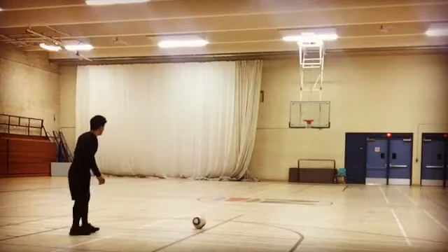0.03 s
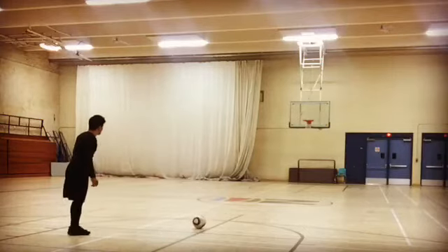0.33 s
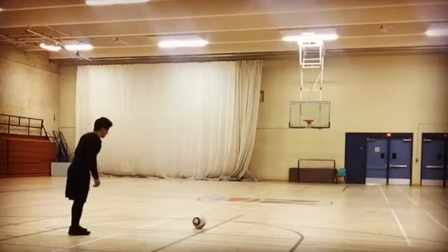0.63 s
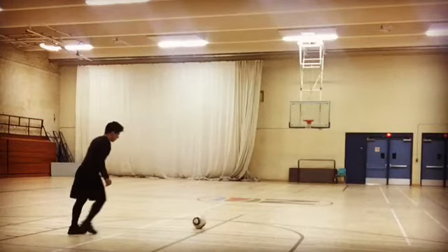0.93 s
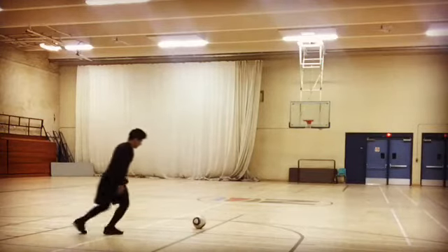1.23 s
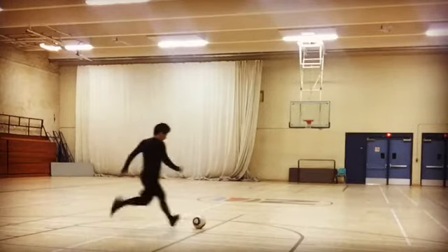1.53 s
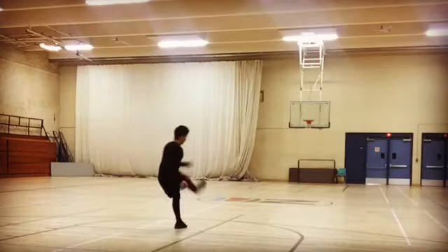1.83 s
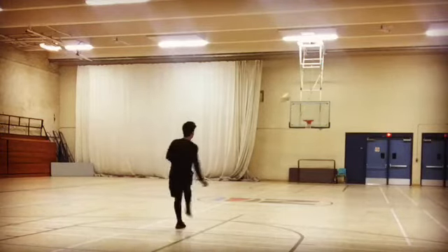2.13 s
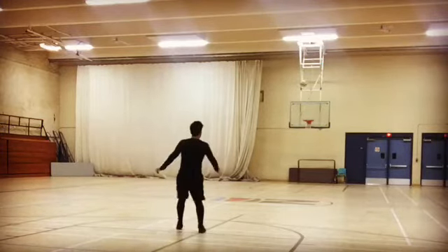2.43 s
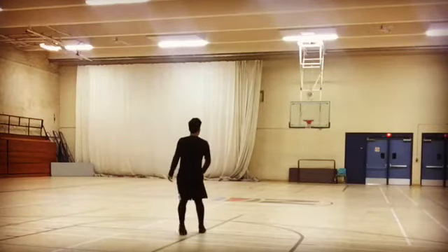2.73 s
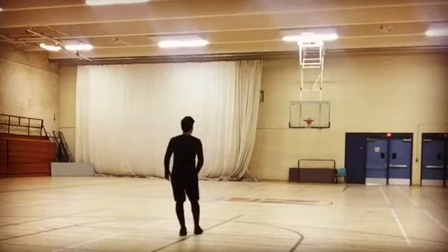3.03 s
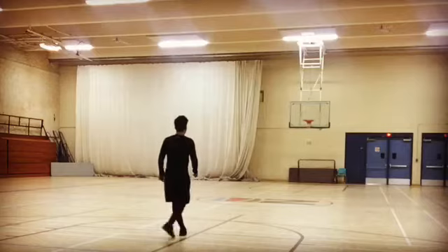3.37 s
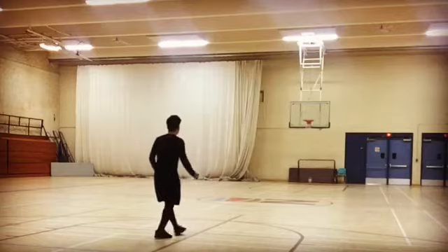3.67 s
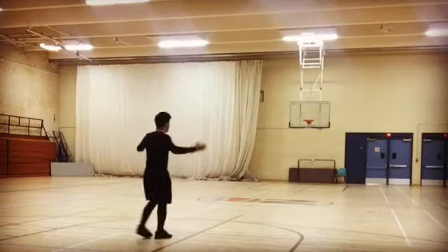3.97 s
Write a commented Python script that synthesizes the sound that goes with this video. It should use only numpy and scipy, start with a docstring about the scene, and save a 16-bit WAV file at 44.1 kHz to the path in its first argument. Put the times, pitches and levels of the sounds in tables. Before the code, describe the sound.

A ball is kicked with a loud, hollow smack after a few scuffing steps in a large, echoing gym. Shoes thud and squeak, then the ball bangs a distant hoop and bounces on the wooden floor. Ventilation rumbles throughout.

```python
"""Ventilation rumbles in a large, echoing gym, and rubber soles scuff the wooden floor in a run-up.
The kick lands with a smack, a hollow ring and a deep thump, and the far walls throw it back.
Clothes rustle; the player thuds onto the sprung floor and shuffles, soles squeaking as they twist.
The ball bangs against the far hoop, whose steel frame rattles and rings, then drops with a slap
onto the booming boards. A tiny dry click follows, and the rumble runs throughout."""
import sys
import numpy as np
from scipy import signal
from scipy.fft import rfft, irfft, next_fast_len
from scipy.io import wavfile
from scipy.ndimage import uniform_filter1d, map_coordinates

SR = 44100
rng = np.random.default_rng(int(sys.argv[2]) if len(sys.argv) > 2 else 0)


def materialize(psi):
    """Save the field psi as 16-bit PCM at rate SR to the path in sys.argv[1].

    A 1-D psi becomes a single channel; in a 2-D psi each row is a channel.
    """
    bounded = np.clip(np.atleast_2d(psi).T, -1, 1)
    quanta = np.round(bounded * 32767).astype(np.int16)
    wavfile.write(sys.argv[1], SR, quanta)


N = 176400
T = np.arange(2 * SR) / SR  # the two-second time axis of one event [s]


def amp(db):
    """Decibels to gain."""
    return 10 ** (np.asarray(db) / 20)


def along(points, hz):
    """Read a curve of (frequency, value) points on a log frequency axis."""
    freqs, values = np.transpose(points)
    return np.interp(np.log(hz + 1), np.log(freqs + 1), values)


def unit(x):
    """Scale to an energy of one."""
    return x / (np.linalg.norm(x) + 1e-12)


def add(track, at, x):
    """Mix x into the track at a time in seconds."""
    start = round(at * SR)
    track[start:start + len(x)] += x[:len(track) - start]


def through(x, response):
    """Convolve, keeping two seconds."""
    y = signal.fftconvolve(x, response)[:len(T)]
    return np.pad(y, (0, len(T) - len(y)))


def pulse(colour, size=8192):
    """The tightest causal pulse with this EQ curve of (frequency [Hz], relative level [dB])."""
    cepstrum = irfft(along(colour, np.fft.rfftfreq(size, 1 / SR)) * np.log(10) / 20)
    cepstrum[1:size // 2] *= 2
    cepstrum[size // 2 + 1:] = 0
    return unit(irfft(np.exp(rfft(cepstrum))))


def wobble(rate, t):
    """Smooth random modulation, rate knots a second."""
    return map_coordinates(rng.standard_normal(1024), [t * rate], mode="mirror")


def swell(rise, t60):
    """An attack and an exponential decay, both timed in seconds."""
    return (1 - np.exp(-T / rise)) * amp(-60 * T / t60)


def arch(length):
    """A fade in and out within length seconds."""
    return np.sin(np.pi * np.minimum(T / length, 1))


def crack(t60):
    """The snap of a contact: a noise burst of a few milliseconds."""
    return unit(rng.standard_normal(len(T)) * swell(0.00027, t60))


# Room tone of the ventilation: (frequency [Hz], relative level [dB])
VENT_COLOUR = [(25, -42), (45, -8.5), (69, -1.5), (140, -11), (169, -12), (253, -22.5), (305, -38),
               (349, -29), (684, -44), (15500, -65)]


def ventilation():
    """Moving air: a gently wavering rumble under a steady, faint hiss."""
    hz = np.fft.rfftfreq(N, 1 / SR)
    air = irfft(rfft(rng.standard_normal(N)) * amp(along(VENT_COLOUR, hz)), N)
    rumble = irfft(rfft(air) / (1 + (hz / 250) ** 2), N)
    waver = amp(0.68 * wobble(5.7, np.arange(N) / SR))
    return amp(-39.5) * (air + rumble * (waver - 1)) / air.std()


# Rubber scuffing or slapping a hard surface: (frequency [Hz], relative level [dB])
RUBBER_COLOUR = [(500, -13.5), (1500, 5), (2500, 0), (3800, -2.5), (4900, -19.5), (15000, -24.5)]
# Shoes on wood: (time [s], knock drive [dB], scuff drive [dB], scuff length [s], sole pitch [Hz])
SHOE_STEPS = [(0.02, -49, -38.5, 0.38, 1520), (1.414, -55, -39, 0.081, 1950), (1.52, -44, -29, 0.051, 1460),
              (1.726, -30.5, -27.5, 0.049, 1090), (2.361, -22.5, -20.5, 0.079, 1503)]


def steps():
    """Each step knocks and scuffs the floor, and that contact rings the sole."""
    out = np.zeros(N)
    for at, knock_db, scuff_db, length, hz in SHOE_STEPS:
        scuff = unit(arch(length) * amp(2.1 * wobble(130, T)) * rng.standard_normal(len(T)))
        sole = unit(np.sin(2 * np.pi * hz * T) * amp(-60 * T / 0.027))
        knock = through(pulse([(1600, 1), (9000, -10)]), crack(t60=0.018))
        contact = amp(scuff_db) * scuff + amp(knock_db) * knock
        add(out, at, through(pulse(RUBBER_COLOUR), contact) + amp(-4.5) * through(sole, contact))
    return out


# Reverb decay of the gym: (frequency [Hz], t60 [s])
HALL_DECAY = [(60, 2.94), (160, 2.45), (420, 2.19), (1200, 1.29), (2900, 0.85), (5500, 0.43), (12000, 0.43)]


def hall(rise, lumpy_db=3, size=512):
    """The gym's reverb: a lumpy tail that builds up and loses its treble first."""
    hz, t, noise = signal.stft(rng.standard_normal(len(T)), SR, nperseg=size)
    lumps = uniform_filter1d(rng.standard_normal(noise.shape), size=4, axis=0)
    lumps = uniform_filter1d(lumps, size=4, axis=1)
    lumps_db = lumpy_db * (hz / (hz + 300))[:, None] * lumps / lumps.std()
    decay_db = -60 * t / along(HALL_DECAY, hz)[:, None]
    tail = signal.istft(noise * amp(lumps_db + decay_db), SR, nperseg=size)[1][:len(T)]
    return unit(tail * (1 - np.exp(-T / rise)))


def swish(length):
    """A grainy, faintly ringing brush: shoe over floor, or cloth over cloth."""
    brush = unit(rng.standard_normal(len(T)) * arch(length) * amp(2.4 * wobble(127, T)))
    ringing = unit(through(brush, crack(t60=0.025)))
    return through(ringing, pulse([(1500, 6), (3800, 2), (4700, -4.5), (9000, -7), (15500, -14)]))


def walls(rise, t60, spiky):
    """A spray of wall reflections; spiky makes their strengths more uneven."""
    noise, sizes = rng.standard_normal((2, len(T)))
    return unit(noise * np.exp(spiky * sizes) * swell(rise, t60))


def ring(modes, t60, damping, rise, waver):
    """Ringing modes: t60 holds at 1 kHz, damping shortens the highs, waver [rad] shakes the phase."""
    out = np.zeros(len(T))
    for hz, db in modes:
        decay = t60 * (hz / 1000) ** -damping
        phase = 2 * np.pi * hz * T + waver * wobble(21.15, T)
        out += amp(db) * swell(rise, decay) * np.sin(phase)
    return out


# Close smack of shoe on ball: (frequency [Hz], relative level [dB])
KICK_COLOUR = [(71, -28), (120, -8.5), (271, -11.5), (360, -6), (459, -21), (552, -9.5), (881, -19),
               (1190, -10.5), (1760, -17), (15500, -48)]
# Slapback from nearby surfaces: (delay [s], relative level [dB])
NEAR_ECHOES = [(.0072, -15), (.026, -5.5)]
# Hollow ring of the ball: (frequency [Hz], relative level [dB])
BALL_MODES = [(178, 0), (375, -3), (548, -4.5), (820, -15), (1210, -14)]


def kick(thump_hz=69):
    """The shoe smacks the ball, which rings hollow over a deep thump."""
    near = amp(-7.5) * walls(rise=0.003, t60=0.31, spiky=0.54)
    near[0] += amp(-14)  # direct sound
    for delay, db in NEAR_ECHOES:
        add(near, delay, amp(db) * pulse([(520, 25), (1500, -1.5), (6000, 2)]))
    smack = through(pulse(KICK_COLOUR), near)
    skin = pulse([(300, -7), (1400, 14), (2600, 2.5), (7000, -10), (15000, -28)])
    snap = amp(-5.5) * through(crack(t60=0.015), skin)
    ball = amp(-19.5) * ring(BALL_MODES, t60=0.11, damping=0.19, rise=0.00058, waver=0.34)
    thump = amp(-17) * np.sqrt(np.abs(arch(0.084))) * np.sin(2 * np.pi * thump_hz * T)
    return smack + snap + ball + thump


# Bass-heavy bloom of the kick in the hall: (frequency [Hz], relative level [dB])
BLOOM_COLOUR = [(20, -47), (34, -5), (71, 2.5), (129, -16), (216, -8.5), (274, -20.5), (384, -13.5),
                (485, -23.5), (552, -21.5), (1170, -27.5), (1440, -36.5), (15000, -64.5)]
# The kick's returns off the far walls: (delay [s], relative level [dB])
WALL_ECHOES = [(.122, -8.5), (.256, -18.5), (.308, -20.5)]
# Dull tone of those returns: (frequency [Hz], relative level [dB])
WALL_COLOUR = [(800, 3), (1280, -1.5), (1600, -11), (4000, -17.5), (4800, -29), (9000, -29.5), (15000, -58)]


def kick_reverb():
    """The hall answers the kick: a slow bloom, far-wall echoes and the ball's lingering ring."""
    out = amp(5.5) * through(pulse(BLOOM_COLOUR), hall(rise=0.036))
    for delay, db in WALL_ECHOES:
        echo = through(pulse(WALL_COLOUR), walls(rise=0.0018, t60=0.87, spiky=0.6))
        top_mode = ring(BALL_MODES[-1:], t60=0.15, damping=0, rise=0.0018, waver=1)
        add(out, delay, amp(db) * (echo + amp(-14) * top_mode))
    return out + amp(-32.5) * ring(BALL_MODES, t60=0.97, damping=0.33, rise=0.084, waver=1.3)


def boom(hz, rise, t60):
    """Struck boards: a low, damped sine whose envelope peaks at one."""
    envelope = swell(rise, t60) * (1 - np.exp(-T / rise))
    return envelope / envelope.max() * np.sin(2 * np.pi * hz * T)


# Thuds of the landing: (time [s], level [dB])
LANDING_THUDS = [(2.258, -19), (2.353, -40)]


def landing():
    """The player's weight thuds into the sprung floor."""
    out = np.zeros(N)
    for at, db in LANDING_THUDS:
        add(out, at, amp(db) * boom(hz=80.6, rise=0.015, t60=0.11))
    return out


# Chirps of rubber on wood: (time [s], length [s], pitch [Hz], level [dB])
SOLE_SQUEAKS = [(2.741, 0.024, 3240, -39), (2.821, 0.053, 3270, -33.5)]


def squeaks():
    """Twisting soles squeak: short, high tones with a rough, jittery pitch."""
    out = np.zeros(N)
    for at, length, hz, db in SOLE_SQUEAKS:
        pitch = hz * (1 + 0.155 * wobble(2600, T))
        tone = np.sin(2 * np.pi * np.cumsum(pitch) / SR)
        add(out, at, amp(db) * unit(tone * arch(length)))
    return out


# Bang of the ball on the hoop: (frequency [Hz], relative level [dB])
HOOP_COLOUR = [(24, -46), (45, -10), (110, 3), (180, -13.5), (335, -9), (450, -14), (610, -13), (740, -19),
               (1400, -19.5), (2050, -25.5), (2650, -28), (3100, -30), (4100, -37), (4650, -43.5),
               (5400, -36.5), (12000, -48.5), (15500, -58)]
# Steel ring of the hoop and backboard frame: (frequency [Hz], relative level [dB])
FRAME_MODES = [(203, -5), (270, 0.5), (336, 2), (535, -10), (612, -6), (807, -7), (909, -7.5), (1056, -5),
               (1224, -6), (1504, -6.5), (2168, -9), (2528, -8.5), (2705, -8), (4055, -17.5)]
# Rattles of the hoop under the blow: (delay [s], relative level [dB])
HOOP_RATTLES = [(0, -22.5), (.008, -30), (0.0457, -31)]


def hoop():
    """The ball bangs on the hoop: the board booms, the frame clangs at each rattle and rings on."""
    space = amp(10) * walls(rise=0.002, t60=0.39, spiky=0.44) + amp(10.5) * hall(rise=0.016)
    bang = through(pulse(HOOP_COLOUR), space)
    slap = amp(-4) * through(pulse(RUBBER_COLOUR), crack(t60=0.016))
    clangs = np.zeros(len(T))
    for delay, db in HOOP_RATTLES:
        add(clangs, delay, amp(db) * ring(FRAME_MODES, t60=0.073, damping=0.32, rise=0.00059, waver=1.92))
    steel = amp(-34) * ring(FRAME_MODES, t60=1.34, damping=0.53, rise=0.0026, waver=0.94)
    backboard = amp(-19) * boom(hz=108, rise=0.011, t60=0.19)
    return bang + slap + clangs + steel + backboard


# The bounce as the room returns it: (frequency [Hz], relative level [dB])
BOUNCE_COLOUR = [(150, -34), (270, -3), (516, -1.5), (1270, -5.5), (3200, -14.5), (5000, -26), (10000, -30),
                 (15500, -42)]


def bounce():
    """The ball's skin slaps the floor; reflections follow over the boom of the boards."""
    space = amp(5) * walls(rise=0.021, t60=0.16, spiky=1) + hall(rise=0.023)
    skin = pulse([(400, -27), (1200, 5), (4000, -8.5), (5200, -21), (15000, -18)])
    slap = amp(0.5) * through(crack(t60=0.0014), skin)
    boards = amp(-22) * boom(hz=82.7, rise=0.004, t60=0.61)
    boards += amp(-29) * boom(hz=108.5, rise=0.015, t60=2.4)
    return through(pulse(BOUNCE_COLOUR), space) + slap + boards


def click():
    """A tiny dry click: one bright pulse."""
    return pulse([(4000, 1), (15000, -9)])


def scene():
    """Run-up, kick, landing, hoop, bounce and click over the room tone."""
    kick_s, brush_s = 1.8553, 0.065
    out = ventilation()
    shoes = steps() + squeaks()
    shoe_reverb = amp(-11.5) * signal.fftconvolve(shoes, hall(rise=0.004))[:N]
    out += shoes + shoe_reverb + landing()
    add(out, kick_s - brush_s / 2, amp(-17.5) * swish(brush_s))  # the shoe brushes the floor
    add(out, kick_s, kick() + kick_reverb())
    add(out, 1.96, amp(-25) * swish(length=0.21))  # clothes rustle as the leg swings through
    add(out, 3.2525, hoop())
    add(out, 3.8393, bounce())
    add(out, 3.9, amp(-23) * click())
    return out[None]


# EQ of the microphone: (frequency [Hz], gain [dB])
MIC_EQ = [(22, -9), (45, 0), (12000, -0.5), (15500, -7)]


def record(dry, top_hz=15800):
    """The microphone thins the extremes and keeps nothing above its band limit."""
    size = next_fast_len(N + SR)
    hz = np.fft.rfftfreq(size, 1 / SR)
    response = amp(along(MIC_EQ, hz)) * (hz < top_hz)
    return irfft(rfft(dry, size) * response, size)[:, :N]


dry = scene()
out = record(dry)
materialize(out)
```